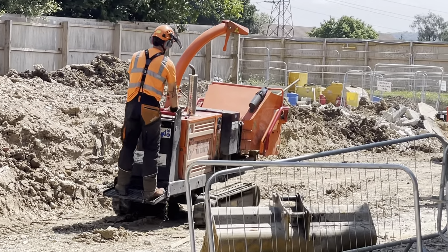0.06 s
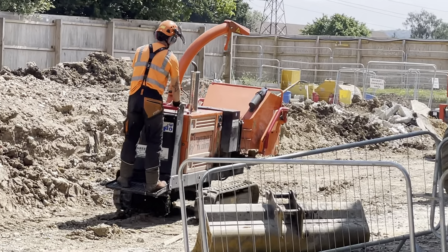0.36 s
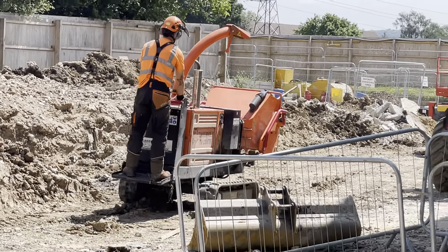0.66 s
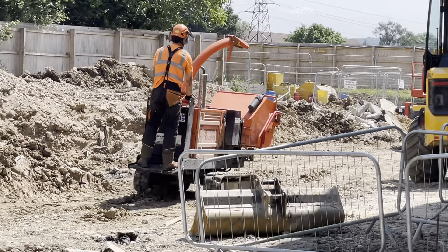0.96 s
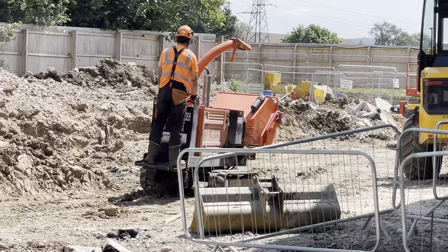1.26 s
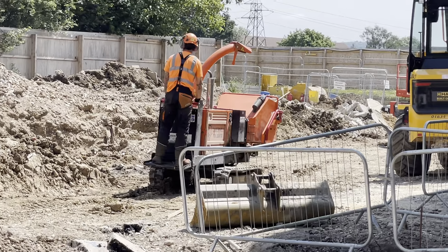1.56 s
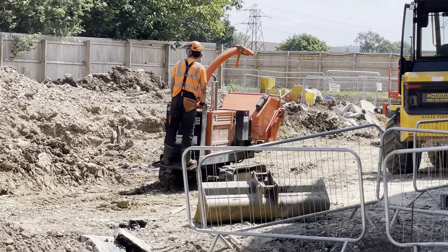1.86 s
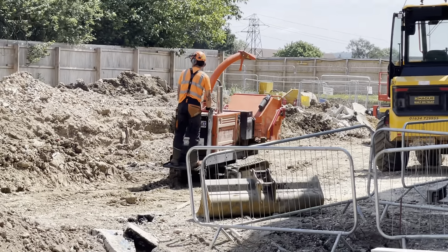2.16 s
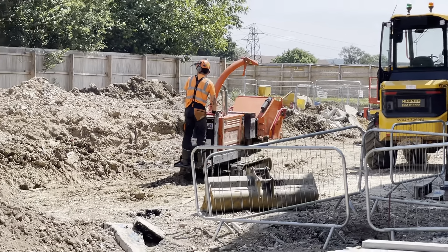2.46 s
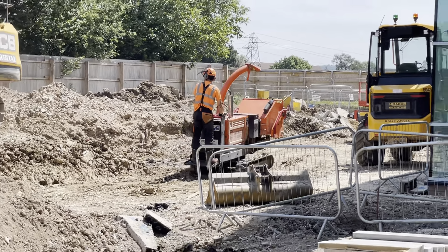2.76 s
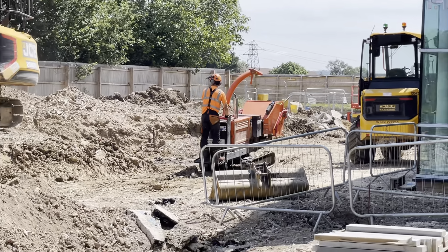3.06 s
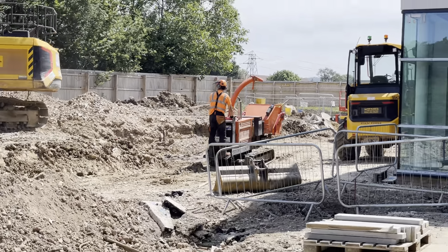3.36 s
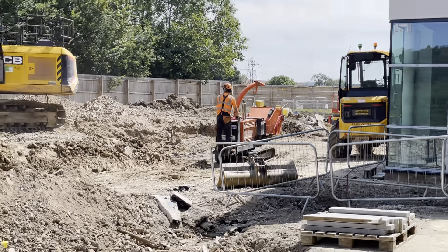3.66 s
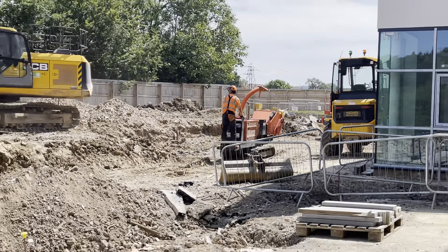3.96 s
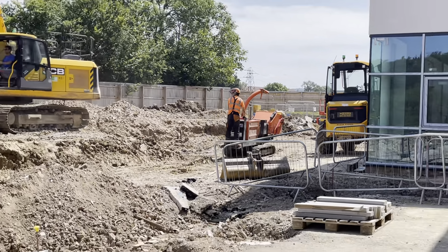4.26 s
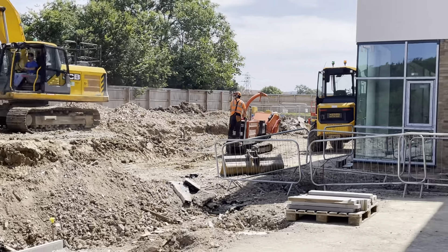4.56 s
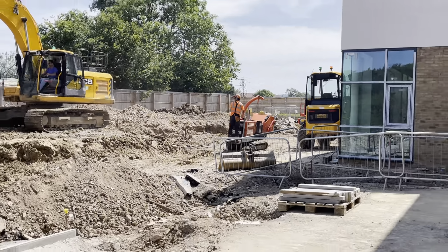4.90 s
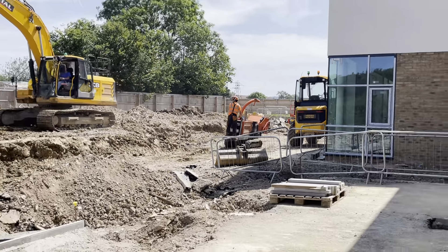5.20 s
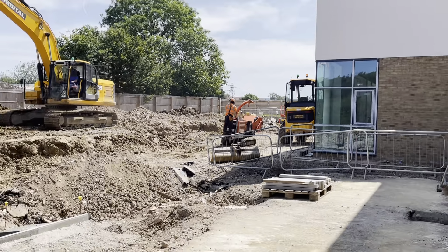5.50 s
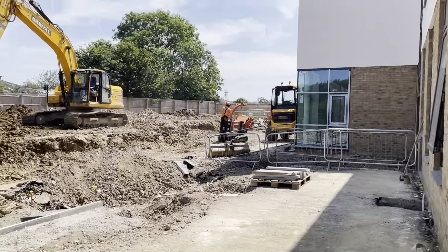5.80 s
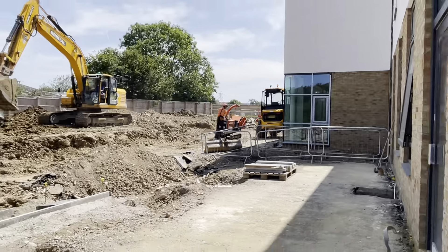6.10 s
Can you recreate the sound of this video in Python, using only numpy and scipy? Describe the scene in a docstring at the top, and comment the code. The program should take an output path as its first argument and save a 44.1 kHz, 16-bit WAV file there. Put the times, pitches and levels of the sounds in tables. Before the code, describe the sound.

Two engines run steadily outdoors on a building site: a humming, faintly whining wood chipper and a rougher machine with a rattling casing. A short metallic jingle opens, and light taps follow while the microphone retreats and the drone grows a little hollow. A gust then rumbles on the microphone, joined by dull thumps, scuffing shoes and a last clatter.

```python
"""On a building site a wood chipper drones, its gear pump whining, and beats against a second, rougher
engine whose casing rattles. Loose metal jingles and scrapes in the first half second. From 2.1 s the
microphone backs away to a wall, whose echo hollows the midrange, while small parts clatter lightly.
From 5 s a gust buffets the microphone as it moves into a corner; dull knocks, shoe scuffs and a last
clatter end the scene."""
import sys
import numpy as np
from scipy import signal
from scipy.fft import rfft, irfft
from scipy.io import wavfile
from scipy.ndimage import uniform_filter1d, minimum_filter1d

SR = 44100
rng = np.random.default_rng(int(sys.argv[2]) if len(sys.argv) > 2 else 0)


def wav_out(sig):
    """Save sig, one row per channel (or a flat mono array), as 16-bit PCM at SR to the path in sys.argv[1]."""
    wavfile.write(sys.argv[1], SR, np.round(np.clip(np.atleast_2d(sig).T, -1, 1) * 32767).astype(np.int16))


N = 279594
T = np.arange(N) / SR
FREQS = np.arange(N // 2 + 1) * SR / N
SIDES = np.array([[1], [-1]])  # left and right, in opposite directions
# The microphone's moves, start and end: off its first spot into the open, to the wall, into a corner.
LEAVE_S, RETREAT_S, CORNER_S = (0.53, 1.13), (2.1, 4.6), (5.3, 6.05)


def undb(db):
    """Decibels to gain."""
    return 10 ** (np.asarray(db) / 20)


def unit(x):
    """Scale to rms 1."""
    return x / np.sqrt(np.mean(x ** 2))


def colour(x, points):
    """Filter by a spectrum of (Hz, dB) points."""
    hz, db = np.transpose(points)
    return irfft(rfft(x) * undb(np.interp(np.log(FREQS + 1), np.log(hz), db)), N)


def resonate(x, hz, width):
    """One resonance, gain 1 at its centre."""
    return irfft(rfft(x) * 1j * FREQS * width / (hz ** 2 - FREQS ** 2 + 1j * FREQS * width), N)


def walk(rate):
    """A smooth random wander of rms 1, taking `rate` steps a second."""
    hold = int(SR / rate)
    steps = np.repeat(rng.standard_normal(N // hold + 2), hold)
    return unit(uniform_filter1d(uniform_filter1d(steps, hold), hold)[:N])


def ramp(start, end):
    """A smooth move from 0 to 1."""
    progress = np.clip((T - start) / (end - start), 0, 1)
    return (1 - np.cos(np.pi * progress)) / 2


def fader(open_db, first_db, wall_db, corner_db):
    """A layer's gain in the open, with trims at the first spot, from the wall on and in the corner."""
    early_db = open_db + first_db * (1 - ramp(*LEAVE_S))
    return undb(early_db + wall_db * ramp(*RETREAT_S) + corner_db * ramp(*CORNER_S))


def partial(turns, fade_db, drift):
    """A sine whose strength and phase wander as the paths over the ground change."""
    strength = np.sqrt(2) * undb(fade_db * walk(1.684))
    return strength * np.sin(2 * np.pi * (turns + rng.random() + drift * walk(3)))


# The diffuse share of the noise. Each row: frequency in Hz, side against mid in dB.
STEREO_WIDTH = [(60, -25), (150, -23.5), (300, -15.5), (550, -8), (1000, -14.5), (1230, -3.5),
                (1500, -15.5), (3000, -13.5), (7000, -8.5), (10000, -35.5), (13000, -11)]

def air():
    """Stereo noise, nearly mono in the bass and mostly wider above."""
    mid, side = rng.standard_normal((2, N))
    return mid + colour(side, STEREO_WIDTH) * SIDES


# The drone. Each row: multiple of the cycle rate, relative dB in the open, relative dB at the wall.
CHIPPER_PARTIALS = [(2, -30.5, -30.5), (3, -23.5, -17), (4, 0, 0.5), (5, -23, -18.5), (6, -25, -16),
                    (8, -31.5, -26), (9, -39, -40.5), (10, -41, -39), (11, -46.5, -43), (12, -46.5, -39.5),
                    (14, -50.5, -47.5)]

def chipper(firing_hz, wall, drift=0.012):
    """The firing tone booms steadily; the crank's speed ripples once a cycle, adding partials around it."""
    cycles = np.cumsum(firing_hz) / SR / 4  # four firings make a cycle
    out = 0
    for order, open_db, wall_db in CHIPPER_PARTIALS:
        wanders = order != 4
        lag = (order < 4) / 4  # lower partials lag, so the hum half warbles and half throbs
        tone = np.sqrt(2) * np.sin(2 * np.pi * (order * cycles - lag + wanders * drift * walk(2.6)))
        out = out + undb(open_db + wall * (wall_db - open_db) + wanders * 2.7 * walk(1.6)) * tone
    return out * fader(-8, -0.6, -1.2, -1.5)


# The gear tone. Each row: multiple of the tooth rate, relative level in dB.
MESH_PARTIALS = [(1, -3), (5, -18), (7, -18.5), (8, -9), (9, -21.5), (10, -15), (11, -14), (12, -13.5),
                 (13, -10), (14, -26), (15, -20.5), (16, -22), (18, -14.5), (19, -27.5)]
# The pump's loudest cluster of lines. Each row: multiple of the shaft rate, relative level in dB.
WHINE_PARTIALS = [(69, -8), (71, -5), (72, -0.5), (73, -2), (75, -16)]

def gear_pump(firing_hz, turns_per_firing=.4427, rasp=0.038, db_per_hz=2.0):
    """Twelve teeth mesh per turn; the shaft's wobble splits each overtone into a cluster of lines."""
    shaft = np.cumsum(turns_per_firing * firing_hz * (1 + .0006 * walk(25))) / SR
    angle = 2 * np.pi * shaft
    wobble = (1.1 * np.sin(angle) + .35 * np.sin(2 * angle)) / (2 * np.pi)
    mesh = 0
    for order, db in MESH_PARTIALS:
        warble = (order > 1) * (wobble + rasp * walk(200))
        mesh = mesh + undb(db) * partial(order * 12 * shaft + warble, fade_db=-2.0, drift=.05)
    load = 1 + 0.37 * np.sin(angle) + 0.18 * np.cos(2 * angle) + 0.23 * np.cos(3 * angle)
    whine = sum(undb(db) * partial(order * shaft + 0.056 * walk(120), fade_db=3.0, drift=.1)
                for order, db in WHINE_PARTIALS)
    effort = undb(db_per_hz * (firing_hz - firing_hz.mean()))  # louder as the engine speeds up
    return effort * (mesh * load + whine) * fader(-49.5, -2, 2.8, -6)


# The second engine's buzz. Each row: multiple of the cycle rate, relative level in dB.
BUZZ_PARTIALS = [(8, -34), (16, -48), (20, -50), (22, -57.5), (25, -47), (26, -44), (28, -46.5), (29, -52),
                 (31, -42), (35, -49), (36, -52.5), (40, -53), (45, -54.5), (52, -60)]

def second_engine(cycles, crest_s=3.15, crest_every_s=2.95, crest_db=2.5):
    """A buzzing comb over a firing tone that swells as the microphone crosses its standing wave's crests."""
    standing_wave = undb(crest_db * np.cos(2 * np.pi * (T - crest_s) / crest_every_s))
    firing = standing_wave * partial(4 * cycles, fade_db=0, drift=0)
    buzz = sum(undb(db) * partial(order * cycles, fade_db=0.6, drift=0.1) for order, db in BUZZ_PARTIALS)
    return firing * fader(-25, 1.5, 3, -2) + buzz * fader(-0.5, 2, -1, -3)


# Hum from further off. Each row: pitch in Hz, level in the open in dB, level at the wall in dB.
DISTANT_TONES = [(57.4, -30, -46), (73.8, -32, -33), (167.6, -32, -34.5), (385, -52.5, -46),
                 (729, -55, -55.5), (770, -51, -54.5)]
# The exhaust's EQ curve. Each row: frequency in Hz, relative level in dB.
EXHAUST_EQ = [(20, -24.5), (40, -19.5), (60, -1), (90, -4), (135, 5), (190, -3.5), (260, -8.5),
              (330, -14.5), (450, -25), (800, -59)]

def distant_machines(wall):
    """Far machines hum over an exhaust rumble, which trades deep bass for low mids near the wall."""
    tones = sum(undb(open_db + wall * (wall_db - open_db)) * partial(hz * T, fade_db=3.0, drift=0.086)
                for hz, open_db, wall_db in DISTANT_TONES)
    rumble = fader(-27.5, 3, 1, -2.5) * unit(colour(air(), EXHAUST_EQ))
    low_mids = 0.81 * wall * resonate(rumble, 300, 170)
    deep_bass = 0.6 * (1 - wall) * resonate(rumble, 45, 30)
    return tones + rumble + low_mids + deep_bass


# EQ curves of the casing's body and of its rattle. Each row: frequency in Hz, relative level in dB.
BODY_EQ = [(200, -24), (340, -5), (450, 2), (560, 1.5), (720, 2), (860, -4.5), (1200, -13), (2000, -46)]
RATTLE_EQ = [(600, -8.5), (1200, 0.5), (1450, 4), (1850, 0.5), (2300, -0.5), (2750, -3), (3100, -3.5),
             (3600, -3.5), (4200, -7.5), (4850, -12.5), (5500, -11), (6700, -12.5), (9700, -14),
             (15000, -26.5)]
# Resonant bands of the rattle, plus a hiss around the pump's whine near 3.8 kHz.
# Each row: centre in Hz, bandwidth in Hz, level against the rattle in dB.
RATTLE_BANDS = [(1345, 100, -9), (2320, 250, -8), (3120, 120, -7.5), (3830, 210, -8.5), (5200, 260, -3),
                (5530, 170, -14), (6460, 130, -7), (8660, 480, -1)]

def casing(cycles, wall, corner, band_hz=1015):
    """Valve gear and sheet metal rattle in time with the second engine; a panel band sings near 1 kHz."""
    throb = undb(0.67 * np.cos(4 * np.pi * cycles) + .5 * np.cos(2 * np.pi * cycles))
    body = unit(colour(air() * throb, BODY_EQ)) * fader(-36, 5, 1, -3.5)
    band = resonate(resonate(air(), band_hz, 300), band_hz, 300)
    panel_hz = 944.5 + 68.46 * wall + 34.9 * corner
    glide = np.exp(2j * np.pi * np.cumsum(panel_hz - band_hz) / SR)  # shifts the band to panel_hz
    panel = unit(np.real(signal.hilbert(band) * glide) * throb) * fader(-35.5, -1.5, 2.5, 2)
    rattle = colour(air() * throb ** .5, RATTLE_EQ)
    peaks = sum(undb(db + 2.8 * walk(1.5)) * resonate(rattle, hz, width) for hz, width, db in RATTLE_BANDS)
    flicker = undb(0.51 * walk(35))
    return body + panel + unit(rattle + peaks) * fader(-35, 1.5, 0.43, -1) * flicker


# Shakes of loose metal. Each row: peak time in seconds, level in dB, half-width in seconds.
JINGLE_BURSTS = [(.17, -45, 0.011), (0.288, -37.5, 0.013), (0.436, -35, 0.013), (0.501, -31.5, 0.017),
                 (0.552, -41, .025)]
# Their bright ring. Each row: pitch in Hz, relative level in dB.
JINGLE_RINGS = [(3090, 2.5), (4330, -5.5), (5300, -15), (5860, -3), (6480, -4.5), (8330, 0), (9220, -14),
                (10370, -13), (11850, -6), (15200, -20)]

def jingles(width_hz=105):
    """Bursts of tiny collisions ring small, quickly damped pieces of metal."""
    swell = sum(undb(db) * np.exp(-.5 * ((T - peak) / spread) ** 2) for peak, db, spread in JINGLE_BURSTS)
    ring = sum(undb(db) * resonate(air() * undb(2.9 * walk(400)) * swell, hz, width_hz)
               for hz, db in JINGLE_RINGS)
    return unit(ring) * np.sqrt(np.mean(swell ** 2))


# Grainy rasps. Each row: peak time in seconds, level in dB, half-width in seconds, band centre in Hz.
RASPS = [(0.173, -42.5, .012, 13000), (0.298, -40, 0.0067, 3630), (.47, -39.5, 0.034, 4760),
         (5.875, -36, .012, 2800), (5.94, -43, .03, 3180), (6.033, -35.5, .02, 3500),
         (6.076, -40.5, .008, 2900), (6.18, -40.5, 0.12, 3600), (6.293, -39, 0.012, 3600)]

def scrapes(width=.4):
    """Short swells of tiny grains: the scrape of jingling metal at the start, shoe scuffs at the end."""
    out, friction = 0, air() * undb(3.5 * walk(400))
    for peak, db, spread, hz in RASPS:
        grains = resonate(resonate(friction, hz, width * hz), hz, width * hz)
        out = out + unit(grains) * undb(db) * np.exp(-.5 * ((T - peak) / spread) ** 2)
    return out


# Midrange dips. Each row: centre in Hz, bandwidth in Hz, share cut at the wall, extra share in the corner.
ECHO_DIPS = [(540, 260, .3, .25), (700, 170, .03, .25), (1350, 260, .4, .35)]

def wall_echo(machines, wall, corner):
    """The wall's echo partly cancels midrange bands, so the machines turn hollow."""
    for hz, width, wall_share, corner_share in ECHO_DIPS:
        depth = wall_share * wall + corner_share * corner
        machines = machines - depth * resonate(machines, hz, width)
    return machines


# Light metal taps. Each row: start in seconds, level in dB, pitch of the ring in Hz.
TAPS = [(2.202, -30.5, 2280), (2.29, -29.5, 2250), (2.534, -32.5, 2295), (3.242, -41, 2970),
        (3.842, -34, 2120), (3.967, -36, 2500), (5.911, -35, 3200), (6.145, -34.5, 3916), (6.22, -42, 2300)]

def clatter(t60=0.14):
    """Loose metal parts tap, each with a short dense ring."""
    out, noise = 0, air()
    for start, db, hz in TAPS:
        decay = (T >= start) * np.exp(-np.log(1000) * np.abs(T - start) / t60)
        ring = resonate(resonate(noise, hz, 0.22 * hz), hz, .45 * hz)
        out = out + unit(ring) * decay * undb(db)
    return out


# The buffeting's EQ curve. Each row: frequency in Hz, relative level in dB.
WIND_EQ = [(30, -26), (70, -10), (150, -0.5), (280, -8), (500, -17), (1000, -22.5), (1600, -39),
           (4000, -39), (8000, -60)]

def wind(rise_s=(4.96, 5.87), rise_db=43, gust_db=-20.5, deep_db=-29):
    """A gust rises and stays; eddies push the microphone's ports opposite ways, the deepest together."""
    lull_db = rise_db * (ramp(*rise_s) - 1)
    eddies = unit(colour(rng.standard_normal(N), WIND_EQ)) * undb(2.7 * walk(18) + gust_db + lull_db)
    deep = unit(resonate(resonate(rng.standard_normal(N), 60, 50), 60, 50))
    return deep * undb(deep_db + .5 * lull_db) + eddies * SIDES


# Dull knocks. Each row: start in seconds, level in dB.
BLOWS = [(5.745, -27.5), (5.839, -20), (6.025, -17)]
# Their low ring. Each row: pitch in Hz, level against the blow in dB, seconds to fall 60 dB.
KNOCK_RINGS = [(71.4, 7, 0.2), (240, 7, 0.093), (350, -2.5, 0.12), (470, -22, 0.049)]

def knocks(attack_s=0.0025):
    """Soft blows ring a few low modes."""
    out = 0
    for start, db in BLOWS:
        age = np.maximum(T - start, 0)
        for hz, mode_db, t60 in KNOCK_RINGS:
            envelope = np.tanh(age / attack_s) * np.exp(-np.log(1000) * age / t60)
            out = out + undb(db + mode_db) * np.sin(2 * np.pi * hz * age) * envelope
    return out


# The stereo image. Each row: frequency in Hz, the left port's lead over the right in radians.
LEFT_LEAD = [(20, 0), (200, -.1), (450, -.55), (900, -.65), (1150, -1.1), (1400, .25), (4000, .6),
             (6000, .75), (7000, 1.45), (8500, 2.45), (9200, 3.05), (11000, 3.25), (12000, 4.1),
             (14000, 5.5)]

def microphone_ports(x):
    """The two ports hear the site with a phase difference, the left a little louder."""
    phase = np.interp(FREQS, *np.transpose(LEFT_LEAD))
    return irfft(rfft(x) * np.exp(.5j * phase * SIDES), N) * undb(0.095 * SIDES)


# The chipper's governed speed, which also drives its pump. Each row: time in seconds, firing rate in Hz.
CHIPPER_SPEED = [(0, 120.77), (0.6, 120.8), (1.1, 121.19), (1.65, 121.52), (2.3, 121.06), (3.2, 120.84),
                 (4.0, 120.63), (4.8, 120.91), (5.5, 121.34), (6.34, 121.15)]

def scene(edge_s=.006):
    """The mix: a bed of machines, the small events on top and wind on the microphone."""
    wall, corner = ramp(*RETREAT_S), ramp(*CORNER_S)
    firing_hz = np.interp(T, *np.transpose(CHIPPER_SPEED))
    second_firing_hz = 101.86 * (1 + 0.000997 * walk(2))
    second_cycles = np.cumsum(second_firing_hz) / SR / 4
    machines = chipper(firing_hz, wall) + gear_pump(firing_hz) + second_engine(second_cycles)
    machines = machines + distant_machines(wall) + casing(second_cycles, wall, corner)
    site = wall_echo(machines, wall, corner) + jingles() + scrapes() + clatter() + knocks()
    fade = ramp(0, edge_s) * (1 - ramp(T[-1] - edge_s, T[-1]))
    return microphone_ports(fade * site) + wind()


def record(dry):
    """A limiter turns down the highest peaks, and a steep low-pass cuts the top."""
    ceiling, window_samples, top_hz = .96, 900, 15600
    safe_gain = np.minimum(1, ceiling / (np.abs(dry).max(axis=0) + 1e-9))
    gain = uniform_filter1d(minimum_filter1d(safe_gain, window_samples), window_samples)
    return signal.sosfilt(signal.ellip(8, .2, 70, top_hz, fs=SR, output="sos"), dry * gain)


dry = scene()
out = record(dry)
wav_out(out)
```